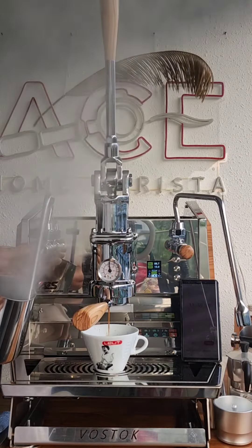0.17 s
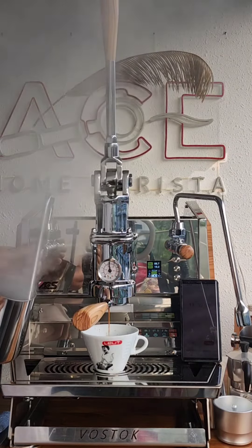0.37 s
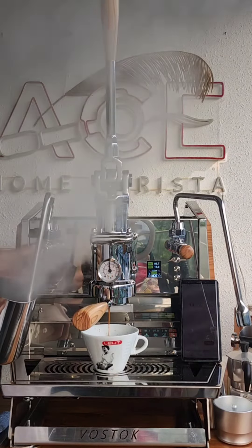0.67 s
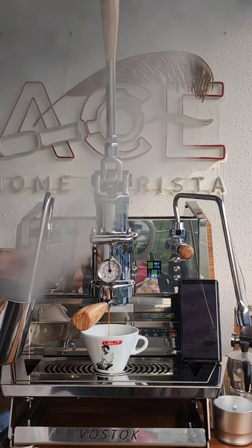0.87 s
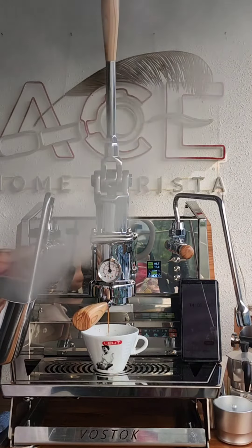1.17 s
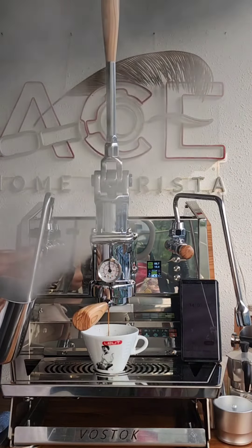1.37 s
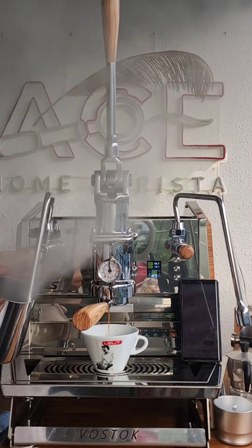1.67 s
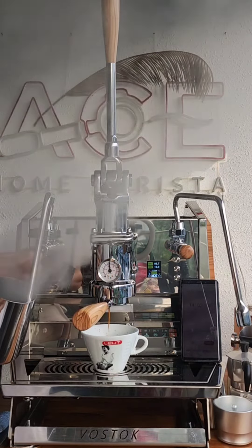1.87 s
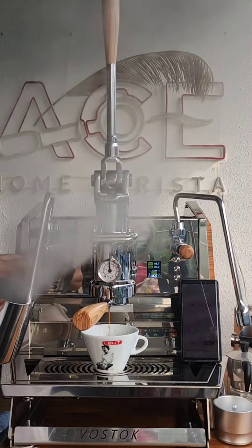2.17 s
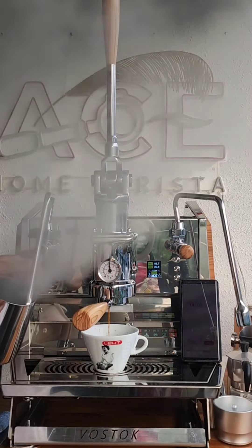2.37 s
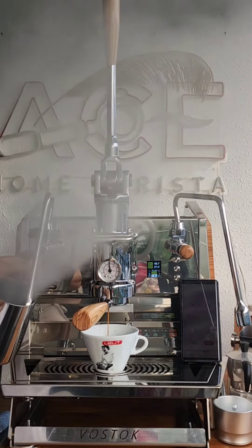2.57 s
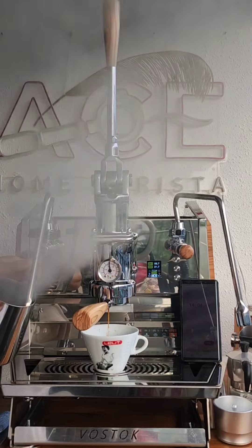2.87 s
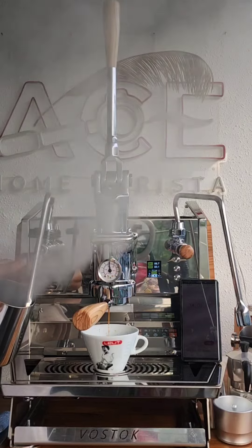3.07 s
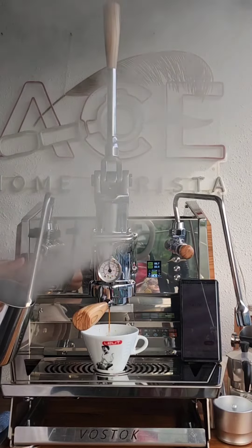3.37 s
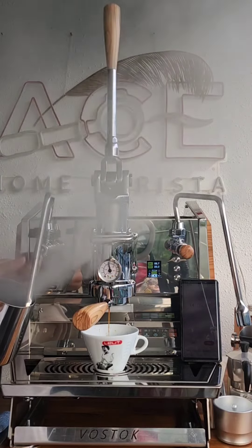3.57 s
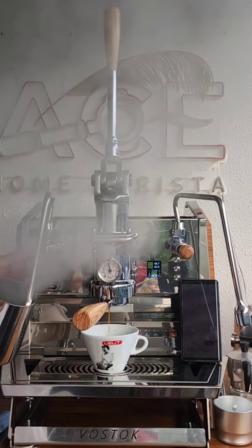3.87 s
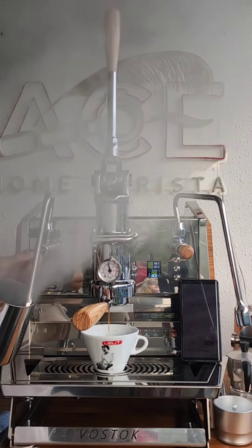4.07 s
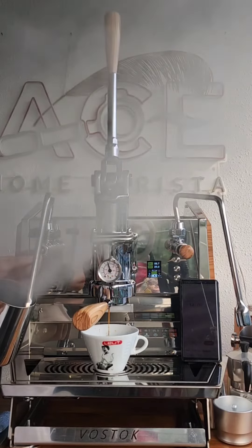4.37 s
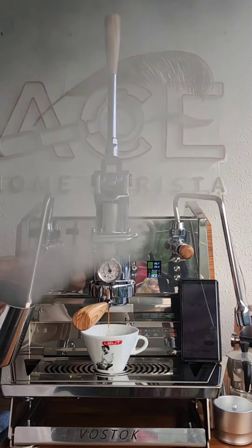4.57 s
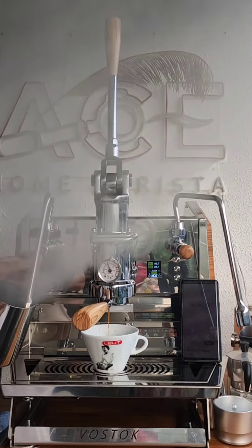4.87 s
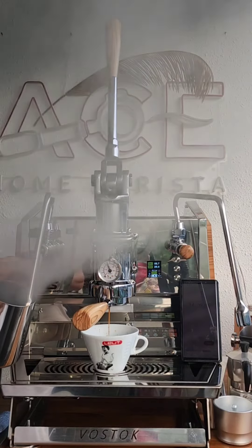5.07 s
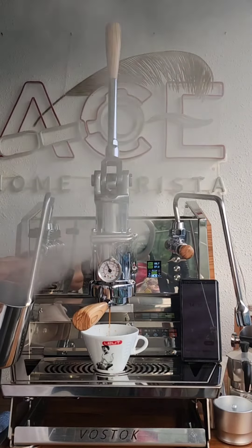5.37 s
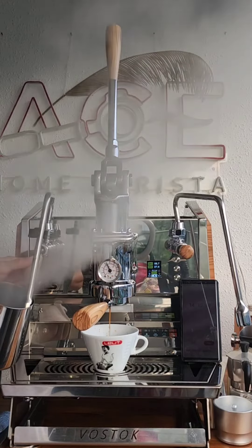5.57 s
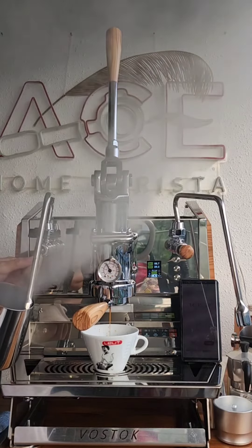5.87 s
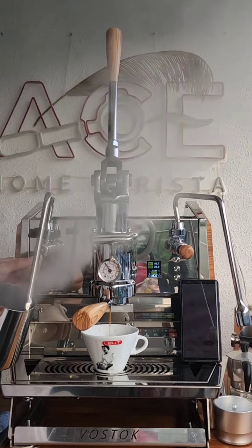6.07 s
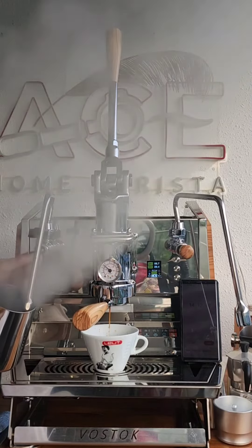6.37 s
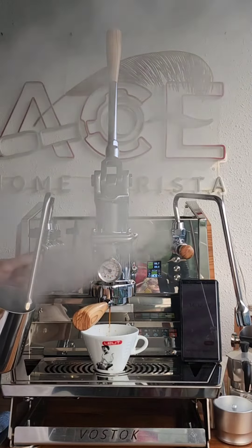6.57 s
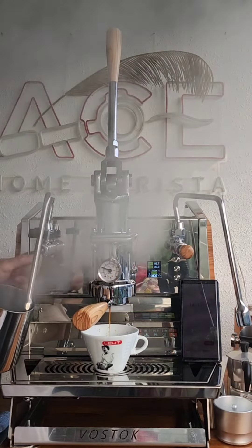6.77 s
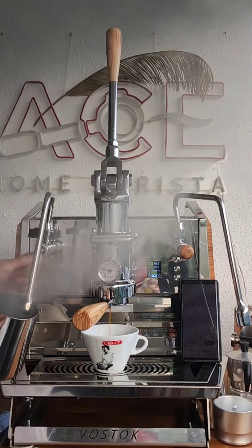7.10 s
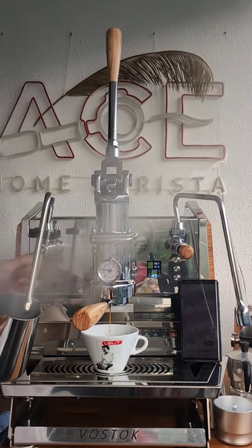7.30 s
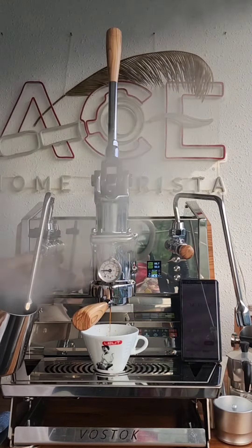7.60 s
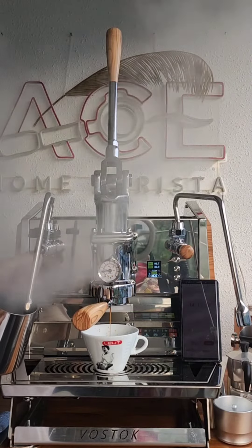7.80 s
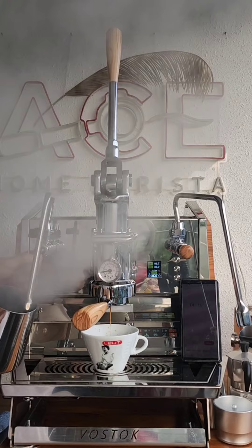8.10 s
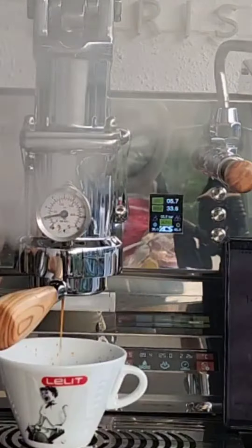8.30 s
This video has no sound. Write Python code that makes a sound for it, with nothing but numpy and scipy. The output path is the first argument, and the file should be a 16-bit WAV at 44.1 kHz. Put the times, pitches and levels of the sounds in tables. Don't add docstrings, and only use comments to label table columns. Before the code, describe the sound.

A wet, sputtering jet of steam blows into a metal jug very near a stereo microphone. Hollow knocks and splashy bursts crowd the opening, return in scattered gushes up to about three and a half seconds, then become rare. A sharp, airy hiss continues throughout, swelling in its middle tones late as the jet crosses the rim. A tiny dip marks a scene change just before the end. Small room, low hum.

```python
import sys
import numpy as np
from scipy import signal
from scipy.fft import rfft, irfft, next_fast_len
from scipy.io import wavfile

SR = 44100
rng = np.random.default_rng(int(sys.argv[2]) if len(sys.argv) > 2 else 0)


def voltage_ratio(level):
    return 10 ** (np.asarray(level, float) / 20)


def int16_out(signal):
    q = np.round(np.clip(np.atleast_2d(signal).T, -1, 1) * 32767)
    wavfile.write(sys.argv[1], SR, q.astype(np.int16))


N = 372204
SIZE = next_fast_len(N)
HZ = np.maximum(np.arange(SIZE // 2 + 1) * SR / SIZE, 1)
TIME = np.arange(N) / SR


def rms_one(x):
    return x / np.sqrt(np.mean(x ** 2) + 1e-20)


def in_time(rows):
    s, *columns = np.transpose(rows)
    return [np.interp(TIME, s, c) for c in columns]


def at_hz(points, hz):
    f, value = np.transpose(points)
    return np.interp(np.log(hz), np.log(np.maximum(f, 1)), value)


def drift(rate):
    step = 20
    r = np.exp(-2 * np.pi * rate * step / SR)
    white = rng.standard_normal(N // step + 2002)
    slow = signal.lfilter([1], [1, -2 * r, r * r], white)[2000:]
    return np.interp(np.arange(N) / step, np.arange(len(slow)), rms_one(slow - slow.mean()))


# frequency [Hz], left-right likeness [0 to 1].
PORT_LIKENESS = [(80, .985), (170, .97), (300, .8), (450, .78), (620, .92), (950, .35), (2100, .75),
                 (2900, .4), (3500, .88), (3900, .8), (4200, .3), (6000, .35), (7500, .58), (9700, .1),
                 (10400, .42), (13500, .25), (14700, .5), (15300, .2)]


def port_noise():
    mid, side = rfft(rng.standard_normal((2, SIZE)))
    alike = at_hz(PORT_LIKENESS, HZ)
    return np.sqrt(1 + alike) * mid + np.sqrt(1 - alike) * side * [[1], [-1]]


def noise_in_time(colour=1):
    return irfft(port_noise() * colour, SIZE)[:, :N]


def resonate(x, hz, width_hz):
    r = np.exp(-np.pi * width_hz / SR)
    poles = [1, -2 * r * np.cos(2 * np.pi * hz / SR), r * r]
    return signal.lfilter([(1 - r * r) / 2, 0, (r * r - 1) / 2], poles, x)


def twice(x, hz, width_hz):
    return resonate(resonate(x, hz, width_hz), hz, width_hz)


def bursts(times, gains, rise_s, fall_s):
    marks = np.zeros(N)
    np.add.at(marks, np.minimum((np.array(times) * SR).astype(int), N - 1), gains)
    t = np.arange(int(8 * fall_s * SR)) / SR
    shape = (1 - np.exp(-t / rise_s)) * np.exp(-t / fall_s)
    return signal.fftconvolve(marks, shape)[:N]


# start of full strength [s], lift [dB], hold [s].
WATER_GUSHES = [(0, 6, 0.012), (.115, 6, .09), (.395, 11, 0.037), (.553, 10.5, .04), (0.684, 10, 0.11),
                (1.493, 6.5, 0.05), (1.676, 7, .02), (2.027, 7.5, .05), (2.264, 3.5, .05), (2.5, 4, .1),
                (2.658, 4.5, 0.0087), (2.77, 2.5, 0.034), (3.04, 10, .04), (3.193, 4, 0.036),
                (3.43, 4.5, 0.034), (3.547, 9, .02), (4.427, 2.5, 0.027), (4.68, 2, .01), (4.84, 5, 0.023),
                (4.978, 5, 0.0081), (5.305, 5.5, .01), (5.66, 2, .03), (6.227, 5, .01), (6.426, 1, .01),
                (7.356, 1, 0.036), (7.85, 3.5, .03), (8.43, 5, .01)]


def gushes():
    rise_s, fall_s = .02, .055
    sputter_db, sputter_per_s = 1.0, 10
    lift_db = np.zeros(N)
    for s, db, hold in WATER_GUSHES:
        corners = [s - rise_s, s, s + hold, s + hold + fall_s]
        lift_db = np.maximum(lift_db, np.interp(TIME, corners, [0, db, db, 0]))
    return lift_db + sputter_db * drift(sputter_per_s)


# start [s], peak level [dB], low thud under the peak [dB].
HEAVY_SLUGS = [(0.098, -15, -18), (0.313, -18.5, -19), (0.396, -15, -21), (0.401, -11, -19),
               (0.451, -21, -12), (0.549, -10, -21), (0.574, -21, -25), (0.676, -8.5, -23),
               (0.698, -14, -15), (0.74, -8, -17), (0.771, -12, -20), (0.818, -17, -23), (0.902, -11, -25),
               (0.932, -15, -23), (0.99, -17, -27), (1.162, -19, -18), (1.181, -17, -23), (1.24, -17, -26),
               (1.679, -13, -14), (2.009, -11.5, -20), (2.104, -21, -22), (2.132, -19, -19),
               (2.314, -15, -11), (2.336, -17, -19), (2.366, -18, -19), (3.042, -18, -18),
               (3.418, -17, -18), (3.471, -17, -21), (3.551, -17, -15), (4.404, -16.5, -24.5)]


def slugs():
    small_db, small_spread_db, small_thud_db = -24, 3, -19
    thin_s = 2.0
    splash_db, splash_law, splash_spread_db = -10.5, -0.38, 2.5
    chance, luck = rng.random(36), rng.standard_normal((66, 2))
    s = -thin_s * np.log(1 - chance * (1 - np.exp(-N / SR / thin_s)))
    peak_db = small_db + small_spread_db * luck[:len(s), 0]
    small = np.transpose([s, peak_db, np.full(len(s), small_thud_db)])
    rows = np.vstack([small, HEAVY_SLUGS])
    splash = splash_db + splash_law * (rows[:, 1] + 20) + splash_spread_db * luck[:, 1]
    return np.column_stack([rows, splash])


# frequency [Hz], density [dB per Hz].
JET_COLOUR = [(1500, -30), (3000, -23.5), (4100, -20), (4550, -9.5), (5000, -6.5), (5700, -13),
              (6400, -8.5), (7000, -10.5), (7500, -2.5), (8300, -2.5), (9800, -6.5), (11500, -0.5),
              (13000, 1.5), (14800, 4), (16000, -0.5)]
# centre [s], lift [dB], length [s].
JET_PUFFS = [
    (4.498, 5, .006),
    (.57, 1, .015),
    (.69, 1, .015),
]


def jet(level_db, bright_db, body_db, shade_db, flutter):
    shared_flicker, own_flicker_db = .5, .8
    noise = port_noise() * voltage_ratio(at_hz(JET_COLOUR, HZ))
    place = np.clip(np.log2(HZ / 2800) * 2.8, 0, 7)
    out = 0
    for k in range(8):
        band = irfft(noise * np.clip(1 - np.abs(place - k), 0, 1), SIZE)[:, :N]
        colour_db = body_db * (k < 4) + shade_db * (k == 4) + bright_db * max(k - 5, 0) / 2.8
        flicker_db = shared_flicker * flutter + own_flicker_db * drift(30)
        out = out + band * voltage_ratio(flicker_db + colour_db)
    for s, lift_db, length in JET_PUFFS:
        level_db = level_db + lift_db * np.exp(-.5 * ((TIME - s) / length) ** 2)
    return voltage_ratio(level_db + 2.5) * out / np.std(irfft(noise, SIZE))


# frequency [Hz], width [Hz].
LOW_TWINS = [
    (603, 100.5),
    (705, 98),
]
# frequency [Hz], width [Hz], level [dB], left over right [half dB].
UPPER_TONES = [(1358, 34, -16.5, -8), (1574, 37, -11, 3), (1735, 33, -10.5, -13), (2166, 49, 3.5, -2),
               (2338, 35.6, 5.5, -4.5), (2492, 107, -5, 1), (3495, 150, -0.5, 4.5), (3740, 176, 0, 3.5),
               (4920, 270, -6.5, -14), (5354, 43, -4, 25), (6264, 430, -0.5, 16), (6644, 120, 4, -7),
               (6697, 47, 7, 15.5), (7496, 247, 4, -7.5), (9190, 110, 2, 0), (10430, 260, -2, -10)]


def pitcher(low_db, upper_db, twin_db, high_db, flutter, water):
    s, peak_db, _, _ = np.transpose(water)
    knock = bursts(s - .0015, voltage_ratio(peak_db), rise_s=0.00047, fall_s=0.00033) + 1e-18
    lumps = voltage_ratio(low_db - 4.5 + 1.0 * flutter + 1.27 * drift(40))
    low = 0
    for (hz, w), share_db in zip(LOW_TWINS, (-twin_db / 2, twin_db / 2)):
        air = noise_in_time()
        blown = twice(lumps * air, hz, w) / np.std(twice(air[0], hz, w))
        struck = voltage_ratio(24.5) * resonate(resonate(knock, hz, 0.51 * w), hz, 3.2 * w)
        low = low + voltage_ratio(share_db) * (blown + struck)

    drive = noise_in_time() * voltage_ratio(.5 * flutter + 0.71 * drift(40))
    tones = []
    for k, (hz, w, db, pan) in enumerate(UPPER_TONES):
        gain = voltage_ratio(db + np.array([[pan], [-pan]]) / 4)
        tones.append((-1) ** k * gain * resonate(drive, hz, w))
    shift = voltage_ratio(.4 * (twin_db + 2.5))
    high = tones[6] / shift + tones[7] * shift + sum(tones[8:])
    upper = sum(tones[:6]) + voltage_ratio(high_db) * high
    return low + voltage_ratio(upper_db + 7.5) * upper / np.std(sum(tones))


# frequency [Hz], density [dB per Hz].
SPRAY_COLOUR = [(350, -14.5), (600, 3), (900, -1), (1250, -1.5), (1900, 1), (2900, -0.5), (4200, -0.5),
                (7000, -7)]
# start [s], peak level [dB], low thud under the peak [dB],
# splash under the peak [dB].
FIRST_CONTACTS = [
    (2.303, -24, 2, -3),
    (2.307, -24.5, 0, -5),
]


def spray(level_db, roar_db, flutter, water):
    s, peak_db, thud_db, splash_db = np.vstack([water, FIRST_CONTACTS]).T
    wash = rms_one(noise_in_time(voltage_ratio(at_hz(SPRAY_COLOUR, HZ))))
    air = noise_in_time()
    roar_band = signal.butter(2, [200, 520], "band", fs=SR, output="sos")
    splash_band = signal.butter(2, [1200, 4200], "band", fs=SR, output="sos")
    roar = rms_one(signal.sosfilt(roar_band, air))
    splash = rms_one(signal.sosfilt(splash_band, air))

    push = bursts(s, voltage_ratio(peak_db + thud_db), rise_s=.0005, fall_s=0.00053) + 1e-18
    thud = voltage_ratio(17.0) * twice(push, hz=403, width_hz=300)
    wash_gain = voltage_ratio(level_db + 8.5 + 1.0 * flutter + 1.6 * drift(59))
    roar_gain = voltage_ratio(roar_db - 3.0 + 2.0 * flutter)
    roar_gain = roar_gain + bursts(s, voltage_ratio(peak_db + thud_db - 7.5), rise_s=0.0024, fall_s=0.011)
    splash_gain = bursts(s, voltage_ratio(peak_db + splash_db - 2.5), rise_s=.001, fall_s=0.0073)
    return wash_gain * wash + roar_gain * roar + thud + splash_gain * splash


# frequency [Hz], density [dB per Hz].
ROOM_COLOUR = [(12, -41), (20, -6), (43, -5), (117, -1), (219, -7), (279, -12), (321, -16), (420, -11.5),
               (550, -33), (920, -120)]


def rumble():
    return voltage_ratio(-47) * rms_one(noise_in_time(voltage_ratio(at_hz(ROOM_COLOUR, HZ))))


# start [s], peak level [dB], bubble pitch [Hz].
COFFEE_DRIPS = [
    (0.1635, -35, 1200),
    (0.2179, -27, 1110),
    (0.265, -25, 1170),
    (0.2932, -35, 1170),
    (0.3651, -37, 1170),
    (0.4806, -21.5, 1180),
]


def drips():
    out = np.zeros(N)
    t = np.arange(int(.04 * SR)) / SR
    envelope = (1 - np.exp(-t / 0.0012)) * np.exp(-t / 0.0027)
    for s, peak_db, hz in COFFEE_DRIPS:
        ring = np.sin(2 * np.pi * 1.014 * hz * (t - 6.8 * t ** 2)) * envelope
        out[round(s * SR):][:len(t)] += voltage_ratio(peak_db + 7.0) * ring
    return out


# time [s], level of the hiss [dB], wetness of the sound [dB], pitcher tilt [dB], brightness of the
# hiss [dB an octave].
WAND_AND_HAND = [(0, -0.5, 5.5, -7, -1), (.4, 0.5, 5, -8, 3), (.75, 1, 6.5, -7.5, 2.5),
                 (1.1, -0.5, 4, -5, 5.5), (1.7, 0, 3.5, -3.5, 5.5), (2.2, 0, 2, -4.5, 2),
                 (2.8, 0.5, 1.5, -1.5, 2.5), (3.4, 0.5, 0, -5, 1.5), (4, 0.5, 1.5, 0, 1),
                 (4.6, 0.5, -1, -2, 0), (5.2, 0, -0.5, -2, 3), (5.8, 0.5, -1.5, -3, 1),
                 (6.4, .5, -2, -1.5, 2), (7, 0.5, 0.5, 0.5, 0), (7.3, -1, -1, 6.5, 3.5),
                 (7.6, 1.5, -3.5, 5, -2), (8.2, .5, -2, 2, 1.5), (8.26, 2.2, 0.5, 2, -2)]


def scene():
    hiss_db, wet_db, tilt_db, aim_db = in_time(WAND_AND_HAND)
    lift_db, water = gushes(), slugs()
    sweep = np.exp(-.5 * ((TIME - 7.25) / 0.16) ** 2)
    flutter = 0.25 * drift(15) + 0.61 * drift(46)

    low_db = -38.5 + wet_db + lift_db
    upper_db = -37 + 0.23 * wet_db + .25 * lift_db + 4 * sweep
    spray_db = -47 + 0.26 * wet_db + .4 * lift_db + 4.5 * sweep
    roar_db = -50.5 + 1.34 * wet_db - 0.43 * tilt_db
    body_db = .45 * wet_db + 3 * sweep
    shade_db = -5 * sweep

    hiss = jet(-23 + hiss_db, aim_db, body_db, shade_db, flutter)
    column = pitcher(low_db, upper_db, tilt_db, -4.5 * sweep, flutter, water)
    return hiss + column + spray(spray_db, roar_db, flutter, water) + rumble() + drips()


# frequency [Hz], left over right [dB].
PORT_BALANCE = [(330, -0.2), (770, 3), (1300, 0), (2700, 6), (4200, 5.5), (6000, -1.5), (7300, 1),
                (8200, 1.5), (9000, -6.5), (9900, -7.5), (11000, -5), (12000, 5), (13500, 3.5), (15500, 8)]
# frequency [Hz], left ahead of right [radians].
PORT_LEAD = [(1500, 0), (2800, -.5), (3400, -.1), (5900, -.2), (6400, -1.1), (8300, -1.5), (9500, -.5),
             (10200, 1.2), (11300, 1), (12800, -1), (14200, -1.5), (15000, -.7), (15600, -2.4)]
# delay [s], left [dB], right [dB].
PANEL_ECHOES = [(.0066, -18, -19), (0.0082, -12.5, -17.5), (.0041, -25, -26), (0.0089, -23, -39),
                (0.012, -25, -22)]


def port_colour():
    tilt = voltage_ratio(at_hz(PORT_BALANCE, HZ) / 2) * np.exp(.5j * at_hz(PORT_LEAD, HZ))
    echoes = 0
    for s, left_db, right_db in PANEL_ECHOES:
        echoes = echoes + voltage_ratio([[left_db], [right_db]]) * np.exp(-2j * np.pi * HZ * s)
    reflected = np.clip(HZ / 1500, 0, 1) / (1 + (HZ / 8000) ** 2)
    return np.array([tilt, 1 / tilt]) * (1 + echoes * reflected)


def low_pass(x):
    return signal.sosfilt(signal.butter(12, 15750, fs=SR, output="sos"), x)


def record(dry):
    top_hz, treble_hz = 15730, 2450
    swell_db, period, crest = 1.3, 1024, 640
    dip_s, dip_half_s, dip_db = 8.2145, .006, -8
    heard = rfft(dry, SIZE) * port_colour() * (HZ < top_hz)
    treble = irfft(heard * np.clip(np.log2(HZ / treble_hz) + .5, 0, 1), SIZE)[:, :N]
    swell = voltage_ratio(swell_db * np.cos(2 * np.pi * (np.arange(N) - crest) / period))
    dip = np.cos(np.pi / 2 * np.clip((TIME - dip_s) / dip_half_s, -1, 1)) ** 2
    mix = irfft(heard, SIZE)[:, :N] + treble * (swell - 1)
    return low_pass(mix * voltage_ratio(dip_db * dip))


dry = scene()
out = record(dry)
int16_out(out)
```